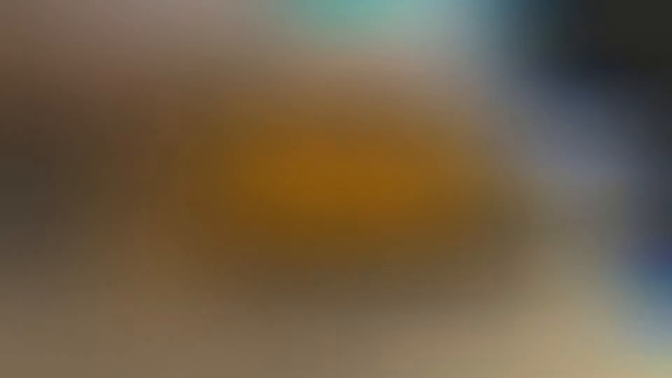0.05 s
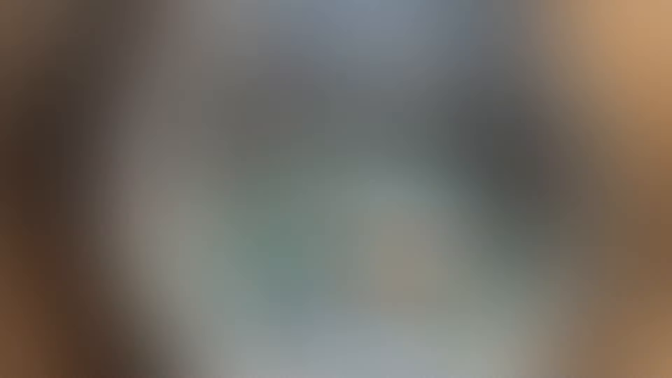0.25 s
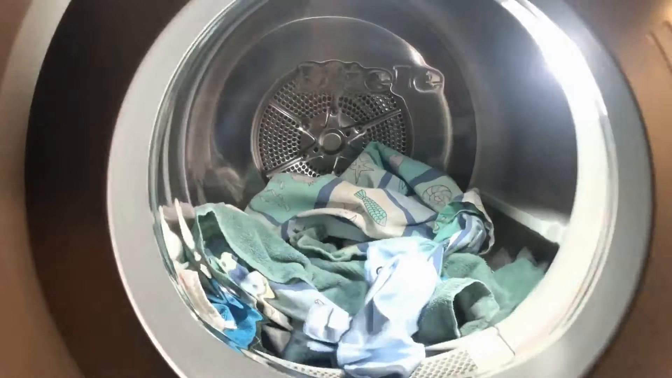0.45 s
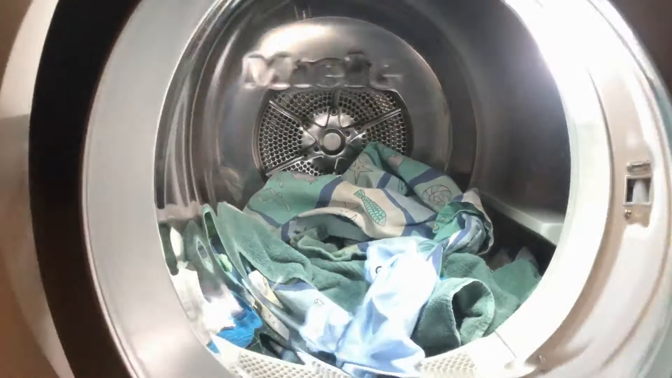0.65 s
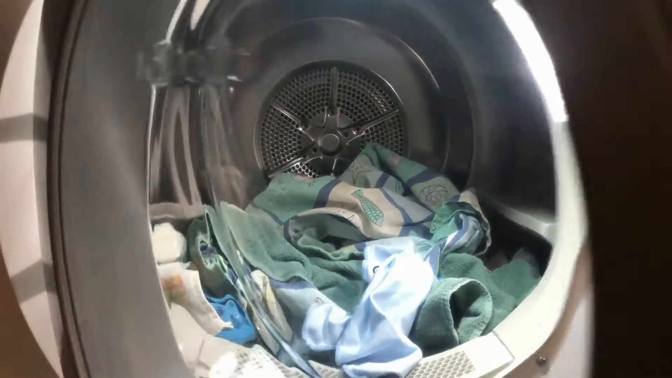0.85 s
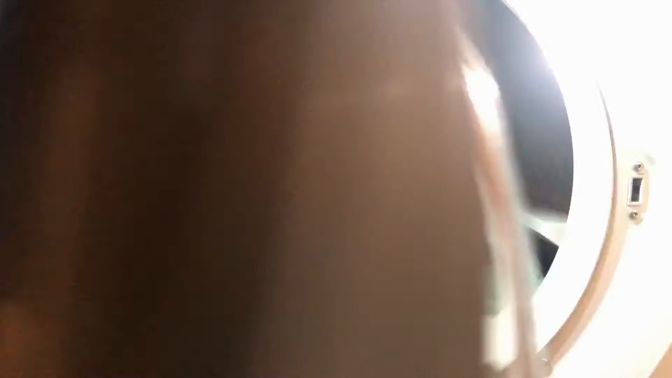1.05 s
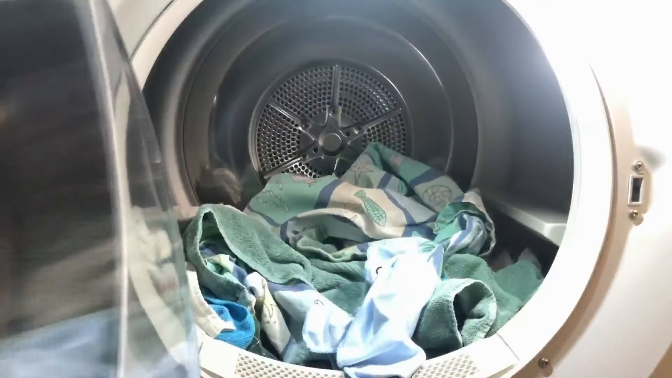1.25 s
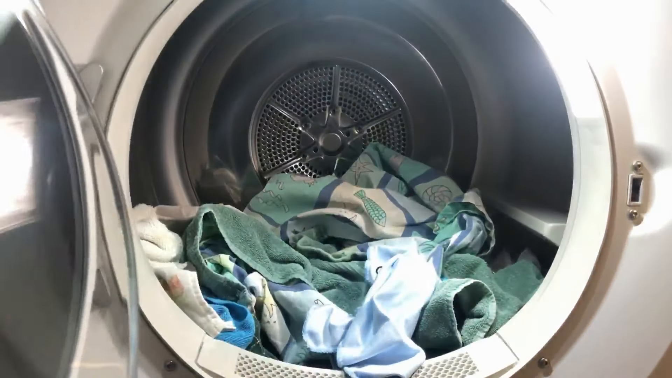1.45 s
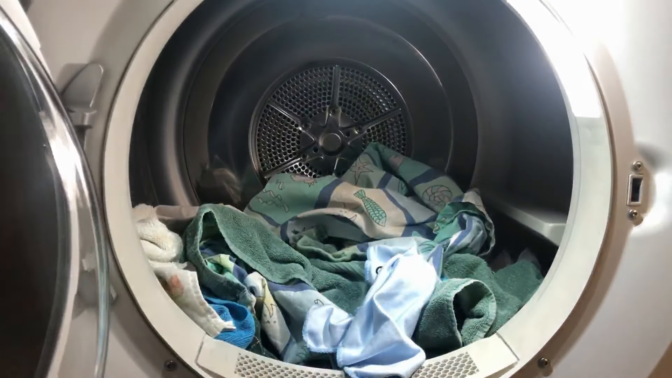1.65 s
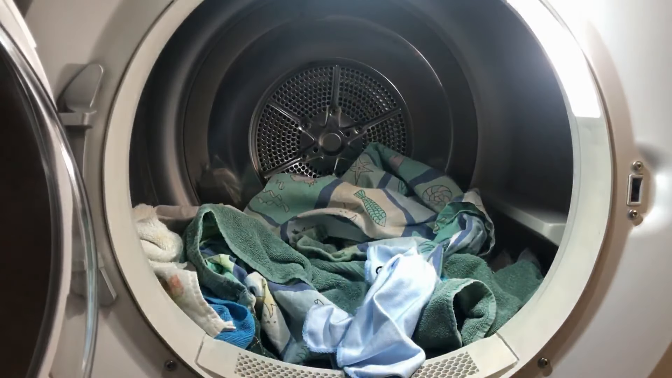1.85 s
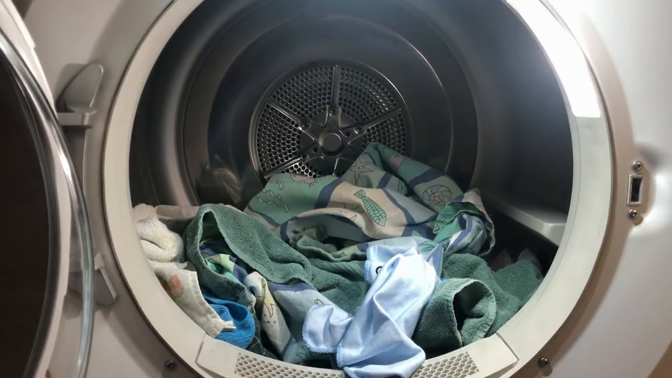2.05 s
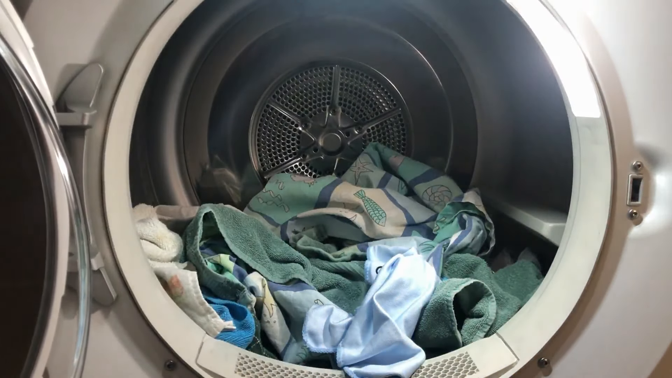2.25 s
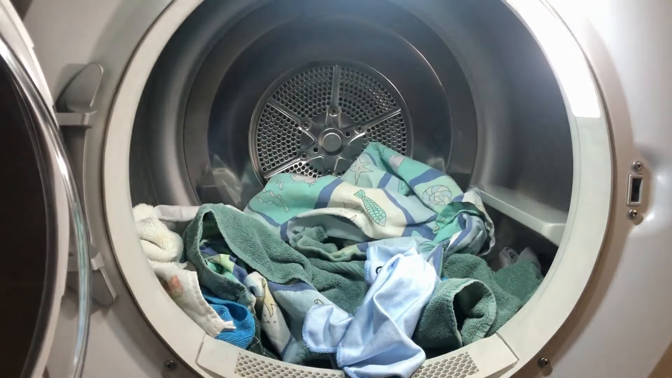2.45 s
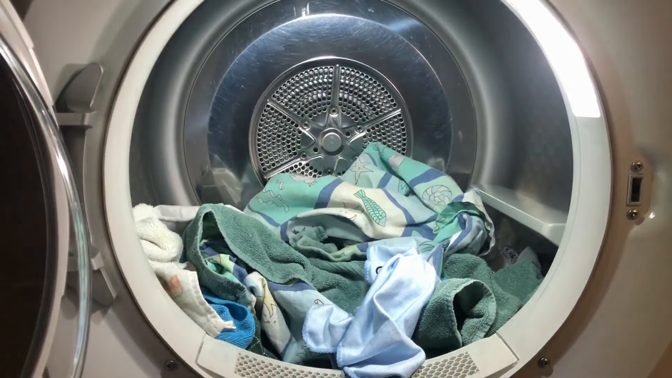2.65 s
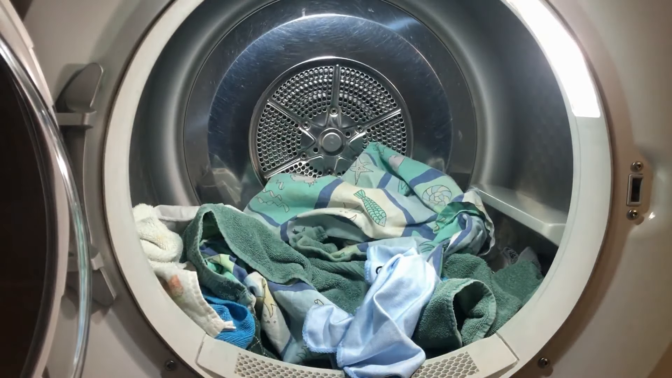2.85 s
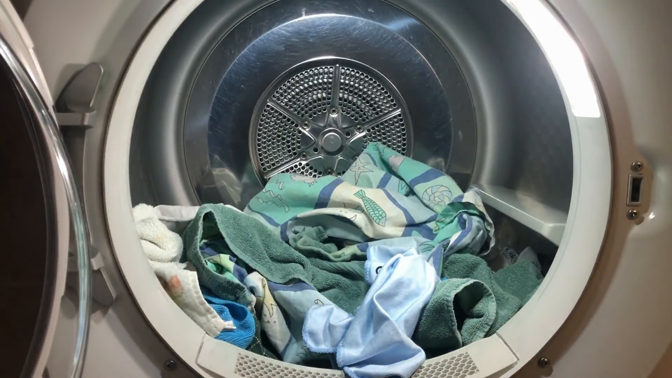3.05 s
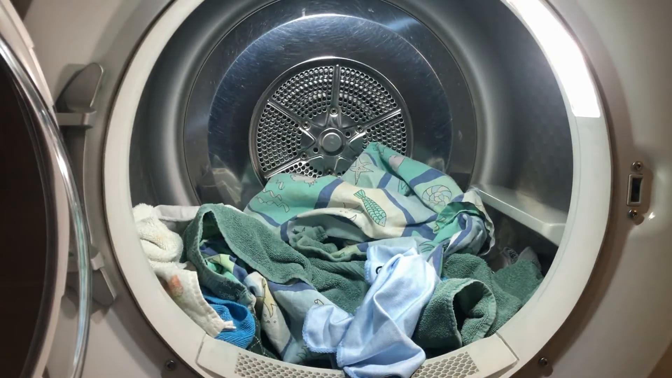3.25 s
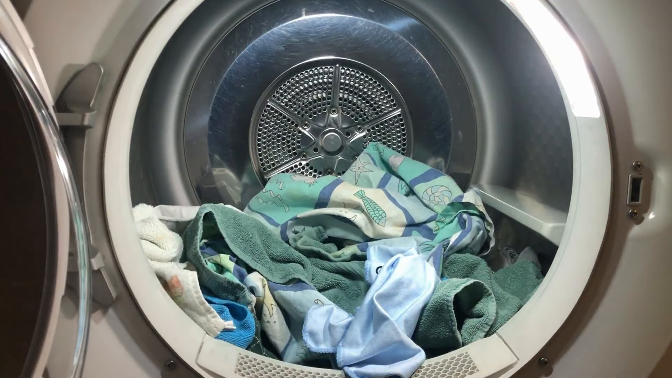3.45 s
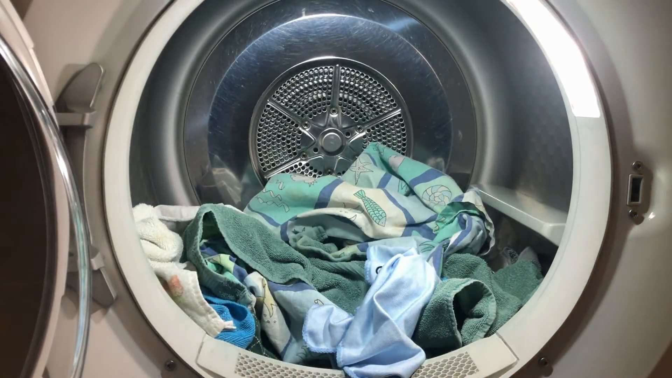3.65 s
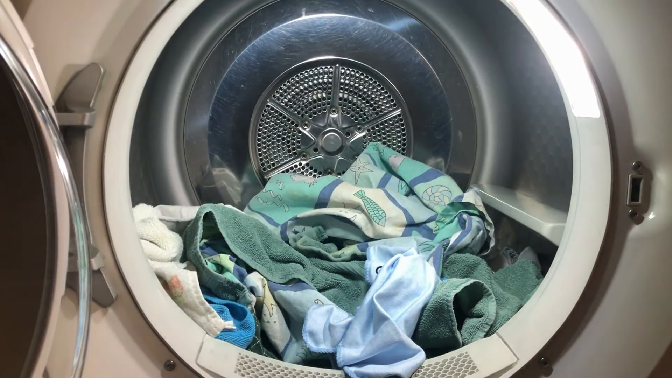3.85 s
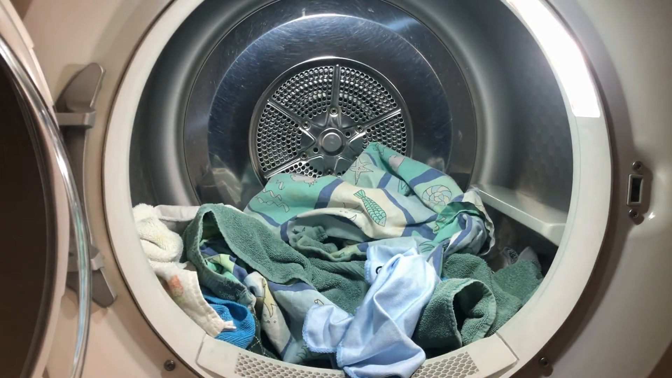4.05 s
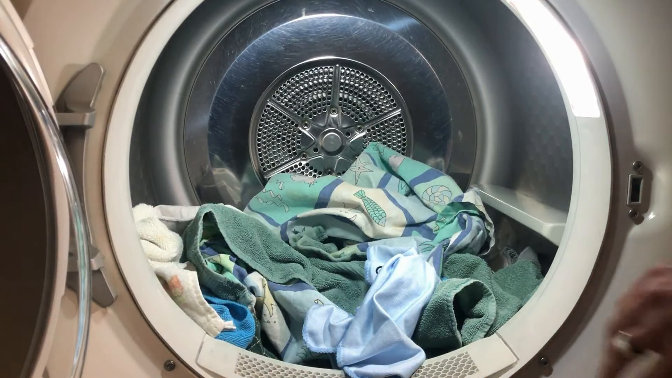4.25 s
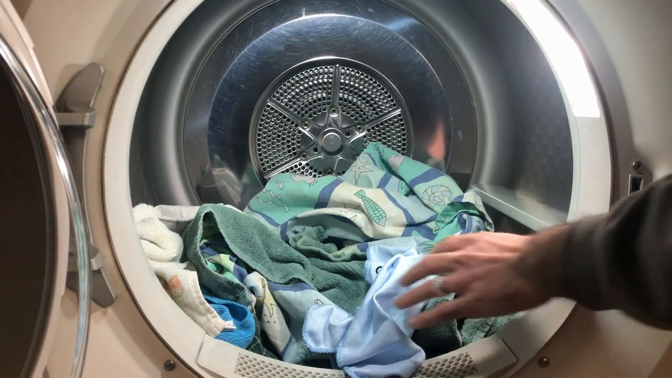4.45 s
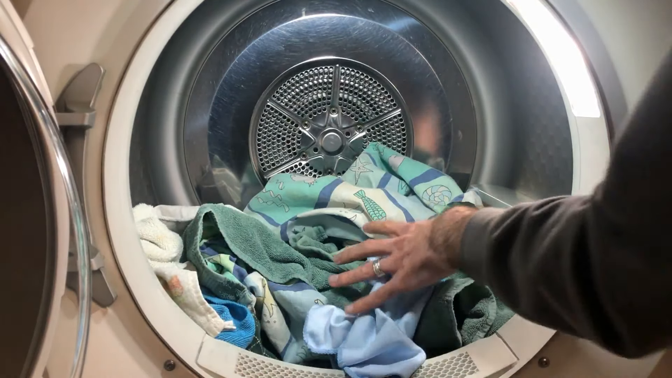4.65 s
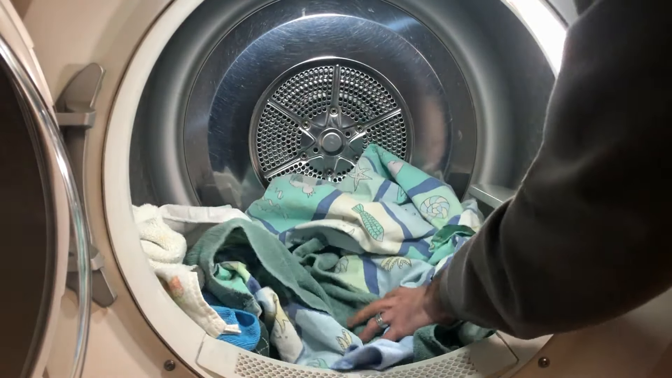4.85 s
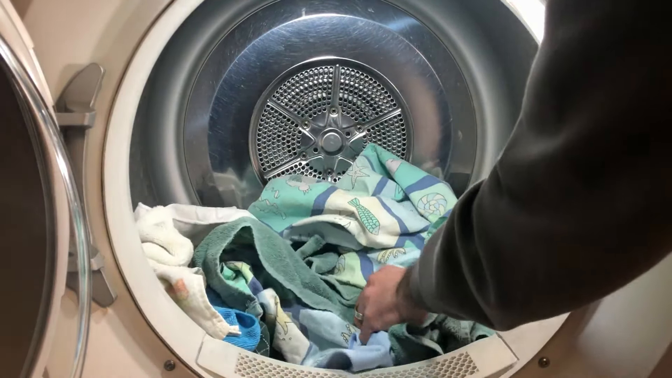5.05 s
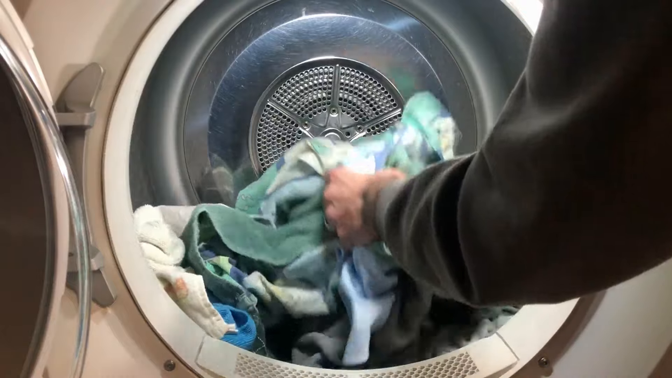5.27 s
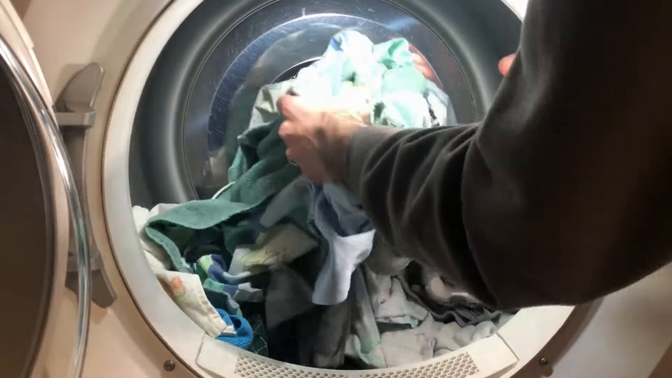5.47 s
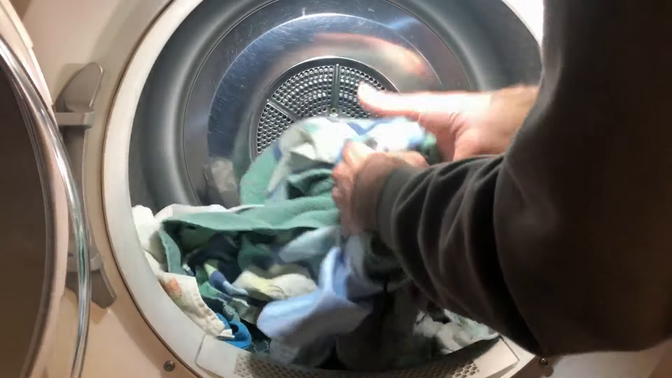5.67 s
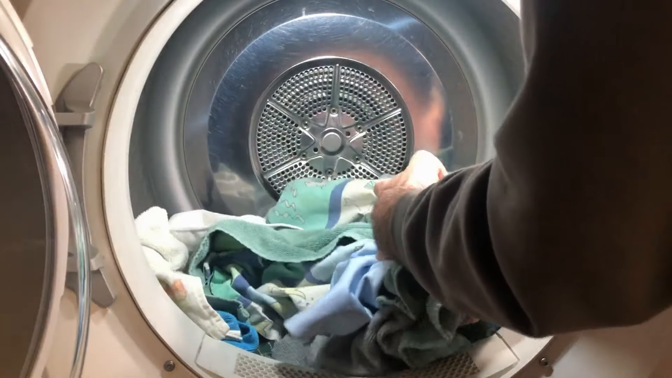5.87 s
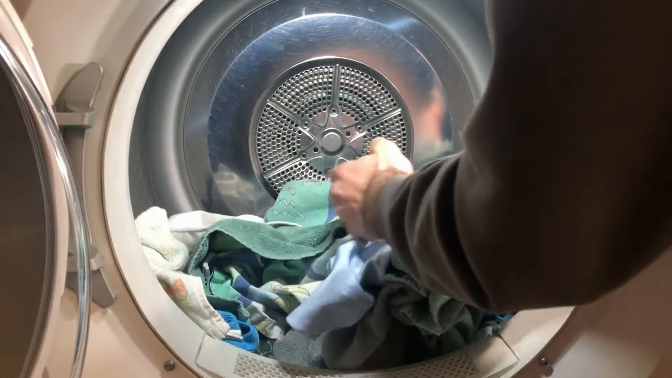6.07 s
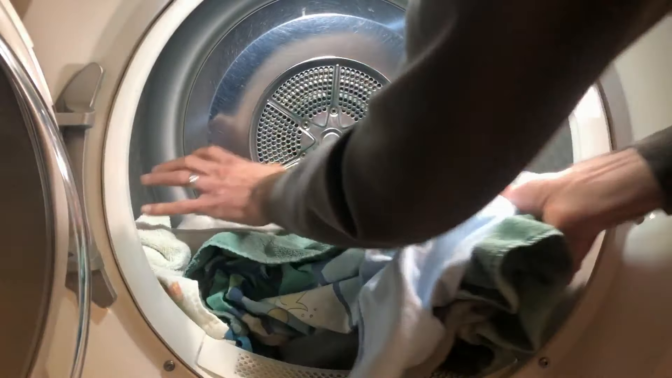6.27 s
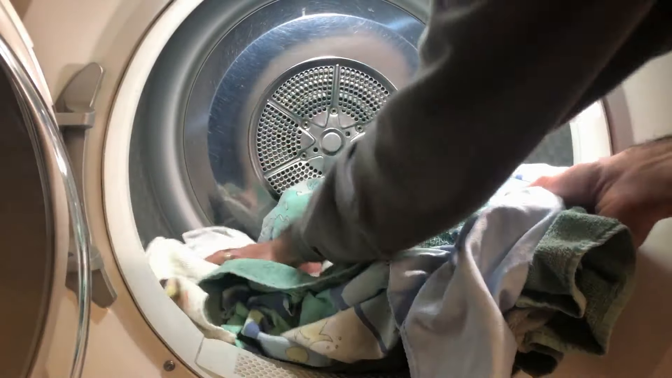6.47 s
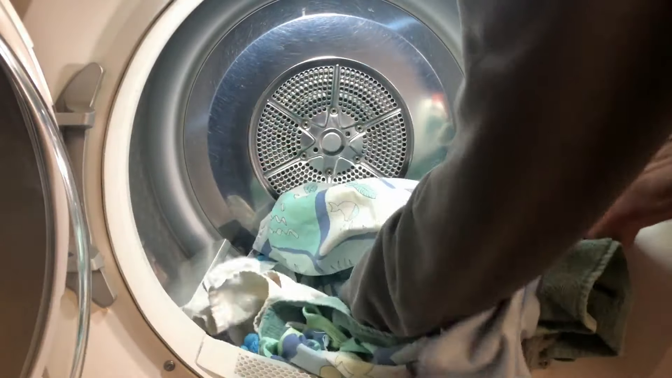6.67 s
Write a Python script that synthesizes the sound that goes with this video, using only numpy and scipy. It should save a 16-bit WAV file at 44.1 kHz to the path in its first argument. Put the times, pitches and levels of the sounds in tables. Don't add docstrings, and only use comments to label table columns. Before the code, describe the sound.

A microphone near a tumble dryer catches quiet hiss and a faint high whine, then a hard metallic snap of the latch with a short ring. The swinging door buffets the air and bumps its stop with a dull boom and small rebounds. Shoes scuff, a basket is set down with a knock, then hands rustle through laundry, ending in several muffled drum thumps.

```python
import sys
import numpy as np
from scipy import signal
from scipy.io import wavfile

SR = 44100
rng = np.random.default_rng(int(sys.argv[2]) if len(sys.argv) > 2 else 0)


def natural_amplitude(level_db):
    exponent = np.asarray(level_db, float) / 20
    return 10 ** exponent


def transcribe(u):
    v = np.clip(np.atleast_2d(u).T, -1, 1)
    q = np.round(v * 32767).astype(np.int16)
    wavfile.write(sys.argv[1], SR, q)


N = 295911

BAND_EDGES = 31 * 2 ** np.arange(0, 9.4, 1 / 3)
BAND_HZ = np.minimum(np.sqrt(BAND_EDGES[1:] * BAND_EDGES[:-1]), 15000)
ROOM_T60 = [(50, 0.57), (150, 0.92), (500, 0.37), (1200, 0.31), (3000, 0.26), (8000, 0.15), (16000, 0.1)]

# pitch_hz, density_db (per Hz)
HISS_COLOUR = [(30, -19), (45, 4.5), (64, 0), (129, -4.5), (295, -3.5), (1220, -18.5), (2070, -18.5),
               (3240, -23.5), (4370, -21), (5200, -20.5), (6350, -26.5), (7400, -24.5), (12000, -28.5),
               (15600, -27)]
HISS_DB = -68
# peak_s, level_db, rise_s, fall_s
WHINE = [
    (.5, -87, 3., 7.1),
    (2.2, -82, 3, 2.105),
    (5., -85.5, 6., 6.),
]
WHINE_HZ, WHINE_WIDTH_HZ = 5660, 60
SWELL_DB = 20

# pitch_hz, density_db (per Hz)
THUDS = [(.01, -64, 0.14, .3), (.3, -68.5, .15, .06), (.415, -40, .06, 0.21), (.85, -62.5, .3, .5),
         (1.56, -61, 0.13, .16), (1.87, -62.5, 0.27, 0.13), (2.04, -83, .06, 0.12), (3.15, -67, 0.18, 0.33),
         (3.606, -65, 0.057, 0.12), (3.736, -70, 0.11, 0.48), (3.984, -71.5, .07, .4),
         (4.276, -76.5, .05, .12), (4.385, -42, 0.019, 0.19), (4.46, -46, .1, 0.69), (5.2, -69, 0.45, .05),
         (5.34, -60, .11, 0.23), (5.71, -60, 0.13, 0.29), (6.146, -63, 0.4, 0.069), (6.226, -65, .05, .6),
         (6.44, -50, 0.05, .5), (6.6, -47, 0.22, .8)]
THUD_COLOUR = [(30, -25.5), (50, -12), (70, 6), (110, -0.5), (160, -11), (260, -45)]

# peak_s, level_db, length_s, direction (sign and size)
GUSTS = [
    (1.191, -55, 0.013, 0.84),
    (1.215, -50.5, 0.0096, -0.89),
    (1.236, -53, 0.0085, 0.93),
    (1.285, -49.5, 0.013, 0.85),
    (1.337, -57.5, 0.011, -0.82),
    (1.443, -49.5, 0.011, 1),
]

# peak_s, level_db, rise_s, fall_s
SCUFFS = [
    (1.194, -69.5, 0.25, .2),
    (3.29, -56.5, 0.038, 0.11),
    (3.34, -54, 0.088, 0.057),
    (3.706, -63.5, 0.29, 0.06),
    (3.828, -52.5, 0.12, 0.059),
    (4.51, -47.5, 0.015, 0.094),
]
HEAVES = [(.01, -74, 0.14, 0.098), (.25, -66.5, 0.054, 0.72), (.8, -82.5, 0.31, 0.56),
          (1.07, -82, 0.27, 0.12), (1.74, -81.5, 0.023, 0.48), (2.77, -74.5, 0.094, 0.24),
          (4.43, -54, 0.044, 0.13), (4.76, -70.5, 0.058, 0.36), (5.78, -64.5, 0.13, 0.13),
          (5.3, -72.5, 0.75, 0.55), (6.37, -71, 0.085, 0.19), (6.6, -68, 0.11, 0.32)]
# time_s, level_db
HANDLING = [(0, -92), (.9, -81), (1.4, -84.5), (1.6, -78.5), (1.72, -86), (2.03, -83), (2.25, -105.5),
            (2.6, -87), (2.98, -76), (3.22, -73), (3.48, -77), (3.95, -71.5), (4.1, -76), (4.68, -68),
            (5.38, -65.5), (5.55, -68), (6.0, -67), (6.71, -65)]
# pitch_hz, density_db (per Hz)
RUB_COLOUR = [(88, -35), (150, -5), (290, -2), (541, -6), (632, -3.5), (1200, -7.5), (1320, -9), (1950, -9),
              (3050, -9), (6260, -16), (7170, -17), (8060, -19), (15600, -22)]
# weave_db, fold_db, weight_db
SOLE, BUNDLE, SLEEVE = (-2.4, -1.6, -23), (-13.5, 11, 12), (-3.5, 1, 1.85)

# start_s, peak_db, centre_hz, t60_s
CRACKLES = [(.212, -52, 12100, 0.025), (.347, -46.5, 5020, 0.015), (1.608, -47, 13000, 0.13),
            (1.838, -54, 11000, .043), (2.2596, -34.5, 11700, 0.15), (3.768, -58, 11900, .1),
            (4.448, -50, 6550, 0.078), (4.64, -52.5, 3990, 0.061), (4.796, -53, 8930, 0.038),
            (4.833, -57, 9000, .028), (4.875, -62, 7840, 0.045), (5.478, -50.5, 5400, 0.036),
            (5.905, -57.5, 4470, 0.044), (5.939, -59, 4000, .03)]
TAPS = [
    (1.862, -58, 420, .1),
    (2.259, -38.5, 5050, .088),
    (2.26, -43, 2730, .26),
    (3.599, -53, 170, .22),
    (4.012, -52, 560, .04),
    (4.359, -39, 4900, .1),
    (4.454, -47, 5200, .036),
    (5.657, -35, 1200, .04),
    (6.517, -44, 700, .1),
]
BUMPS = [
    (0.335, -43, 1508, 0.21),
    (1.862, -54.5, 1200, 0.16),
    (2.758, -58, 1200, 0.35),
    (3.595, -50.5, 915, 0.52),
]
CREAKS = [
    (.135, -54, 736.3, 0.61),
    (.231, -43.5, 1100, .2),
    (.372, -44, 900, 0.62),
    (.373, -28.5, 2972, 0.48),
    (6.465, -43, 639.5, 0.089),
]
CATCH = [
    (.3696, -19, 2500, .015),
    (.3701, -15, 10000, .012),
]
POPS = [
    (.931, -46, 850, .06),
    (.954, -45, 1000, .06),
]
SLIPS = [
    (.276, -53.5, 9000, 0.14),
    (.334, -50, 10950, .15),
    (4.494, -38, 4100, 0.17),
    (4.495, -40.5, 12000, 0.18),
    (4.506, -56, 4500, 0.068),
    (4.36, -49, 12000, .12),
]
# width_octaves, snap_db
CRACKLE_KIND, TAP_KIND, BUMP_KIND, CREAK_KIND = (1, 2.8), (0.46, 1.88), (1.3, 0.94), (0.93, -9.5)
CATCH_KIND, SLIP_KIND = (1.1, 7), (1.1, -7.5)

# start_s, peak_db, pitch_hz, t60_s
RINGS = [(.416, -37, 1196, .3), (.42, -50, 813, .69), (.385, -39, 86, 1.1), (.46, -46, 64, 1.0),
         (1.627, -59.5, 367.7, .38), (1.74, -70.5, 1101, .35), (2.252, -41, 88, .2), (2.28, -40, 253, .3),
         (2.463, -47, 375, .14), (2.48, -48, 183, .5), (2.495, -49, 253, .3), (2.81, -52, 255, .25),
         (2.9, -53.5, 257.4, .24), (3.785, -59, 1124, .46), (3.8, -67, 3400, .23), (4.375, -37, 88, .7),
         (4.39, -40, 290, .2), (4.543, -45, 1370, .06), (4.74, -56, 800, .3)]
PINGS = [(.212, -54, 1500, .03), (.277, -58, 6200, .1), (.277, -66, 12300, .15), (.278, -60, 2050, .15),
         (.278, -62, 2950, .12), (.279, -64, 4500, .15), (.348, -54, 3300, .06), (.3693, -9, 1180, .016),
         (.3695, -21, 780, .06), (.372, -22, 2400, .05), (.931, -51, 850, .06), (.954, -50, 1050, .05),
         (4.3595, -27, 1150, .06), (4.375, -29, 1180, .045), (4.359, -34, 750, .08), (4.36, -41, 2600, .08),
         (5.657, -36, 1150, .04), (5.6575, -43, 2000, .03)]
RING_SWELL_S, PING_SWELL_S = 0.0099, 0.00022
RING_SPLIT = 0.054

# peak_s, level_db, rise_s, fall_s
BOOM = [
    (2.275, -42, 0.016, 0.12),
    (2.335, -36, 0.052, 0.064),
    (2.43, -50, 0.089, .15),
    (2.56, -47, 0.22, .17),
    (2.73, -51, 0.047, 0.12),
    (2.85, -54, .07, .1),
    (2.96, -53, .2, 0.1),
    (3.02, -57.5, .1, 0.032),
    (3.1, -65, 0.049, .06),
    (3.17, -65.5, 0.09, 0.12),
]
BOOM_HZ = 67.2

# pitch_hz, density_db (per Hz)
DRUM = [
    (6.359, -49),
    (6.419, -44),
    (6.464, -37),
    (6.516, -30.5),
    (6.534, -28.5),
    (6.555, -34.5),
    (6.6, -48),
    (6.639, -40.5),
]
DRUM_MODES = [(130, -18, 0.23), (186.6, -2, 0.49), (296, -2, 0.12), (582, -6.5, 0.088), (850, -21, 0.12)]
DRUM_COLOUR = [(35, -37), (60, -18), (202, 0), (360, -12), (667, -10), (749, -17), (1240, -22.5),
               (2080, -31), (3570, -36), (6000, -40), (7800, -65), (13200, -120)]
RIM = [
    (5.657, -27),
    (5.765, -38),
    (5.776, -39),
    (5.827, -49),
]
RIM_MODES = [(253, -10.5, 0.63), (374, 1, 0.16), (460, 0.5, 0.19), (776, -16, 0.068), (985, -18, 0.19),
             (1400, -40, 0.25), (1640, -15, 0.23)]
RIM_COLOUR = [(59, -54), (100, -13), (467, 2.5), (795, 3), (1010, -7), (1220, -8), (1690, -32), (2070, -41),
              (2460, -31), (6000, -28), (7800, -66), (13200, -120)]
BASKET = [
    (4.358, -21),
    (4.385, -32),
    (4.541, -42.5),
]
BASKET_MODES = [(84.7, -22, 0.73), (186.2, -7, 0.79), (288, -10, 0.18), (361, -11, 0.52),
                (430, -13.5, 0.72), (614, -13, 0.2), (699, -16.5, 0.36), (795, -7.5, 0.26), (860, -6, 0.25),
                (940, -14, .25), (1136, -10, 0.16), (1230, -11, 0.39), (1390, -27, 0.26), (1922, -24, 0.24)]
BASKET_COLOUR = [(29, -45), (50, -9), (167, 2), (218, -3), (291, 2.5), (520, -2), (997, -7), (1150, 0),
                 (1470, -9), (1660, -12), (2110, -17), (2620, -20), (16000, -45)]
STOP = [
    (2.251, -25),
    (2.466, -37.5),
]
STOP_MODES = [(182, -12.5, 0.52), (251, 0, 0.3), (379, 2.5, 0.14), (430, -9.5, 0.32), (610, -26, 0.21),
              (683, -16, 0.36), (890, -32, 0.48)]
STOP_COLOUR = [(47, -28), (80, -5), (125, -12.5), (259, -7.5), (518, -11.5), (606, -11), (1050, -34),
               (1150, -28), (5000, -57), (6500, -81), (11000, -120)]
# pitch_hz, level_db, t60_s
REBOUNDS = [
    (2.638, -51),
    (2.756, -50),
    (2.9, -57.5),
]
REBOUND_MODES = [(252, -2, .2), (346, -0.5, .12), (400, 1, .1), (598, -14, .1)]
LATCH = [
    (.3692, -7),
]
LATCH_MODES = [(85.1, -11.5, .5), (815, 0, .17), (1200, -2.5, 0.33), (1360, -10, 0.5), (1707, -9.5, 0.099),
               (2000, -10, .18), (2320, -11.5, .2), (2475, -5, 0.27), (2924, -9.5, 0.16),
               (3289, -6.5, 0.13), (3420, -5, 0.11), (3680, -9.5, .23), (4150, -10, .2),
               (4850, -12.5, 0.28)]
LATCH_COLOUR = [(29, -45.5), (50, -22.5), (98, -13), (234, -25), (398, -9), (560, -10.5), (746, -8),
                (1050, -8), (1210, -5), (1620, -10), (2400, -7.5), (3410, -11), (4450, -12.5),
                (6300, -16.5), (16000, -36)]
# pitch_hz, level_db, t60_s
HUM_MODES = [(810, -10.5, .9), (866, -14.5, .7), (977, -10, .6), (1007, -11.5, 0.74), (1110, -5.5, 0.55),
             (1174, -9, 0.41), (1211, -4.5, .5), (1290, -10, .6), (1380, -8, 0.54), (1390, -6, 0.27)]
PARTIAL_SPREAD = .02

STEADY_TOP_HZ, MIC_CUT_HZ = 15850, 40
HOUSING_LAG, HOUSING_ECHO = 21, .28
SETTLE_S, SETTLE_DB = 0.32, -5
TREBLE_GAP_S, TREBLE_GAP_HZ = (.351, .365), 3900


def rms_one(x):
    return x / np.sqrt(np.mean(x ** 2) + 1e-20)


def at_hz(points, hz):
    pitch_hz, value = np.array(points).T
    return np.interp(np.log(hz), np.log(pitch_hz), value)


def drift(rate):
    r = np.exp(-80 * np.pi * rate / SR)
    slow = signal.lfilter([1], [1, -2 * r, r * r], rng.standard_normal(N // 40 + 2002))[2000:]
    return np.interp(np.arange(N) / 40, np.arange(len(slow)), rms_one(slow))


def swells(rows):
    t = np.arange(0, N + 64, 64) / SR
    power = 0
    for s, db, rise, fall in rows:
        distance = np.maximum((s - t) / rise, (t - s) / fall)
        power = power + natural_amplitude(db - SWELL_DB * distance) ** 2
    return np.interp(np.arange(N) / SR, t, np.sqrt(power))


def split(source):
    bands = []
    for k, (low, high) in enumerate(zip(BAND_EDGES, BAND_EDGES[1:])):
        band_pass = signal.butter(2, [low, high], "band", fs=SR, output="sos")
        bands.append(signal.sosfilt(band_pass, source[k % 2]))
    return np.array(bands)


def add(out, s, sound):
    i = round(s * SR)
    out[i:i + len(sound)] += sound[:N - i]


def burst(bands, colour_db, t60, rise_cycles):
    t = np.arange(int(.9 * SR)) / SR
    start = rng.integers(0, N - len(t))
    gain = natural_amplitude(colour_db) / np.sqrt(np.sum(natural_amplitude(colour_db) ** 2 * BAND_HZ * .46 / SR))
    swell = (1 - np.exp(-t * BAND_HZ[:, None] / rise_cycles)) ** 2
    decay = natural_amplitude(-60 * t / t60[:, None])
    return gain @ (bands[:, start:start + len(t)] * swell * decay)


def background(bands):
    r, w = np.exp(-np.pi * WHINE_WIDTH_HZ / SR), 2 * np.pi * WHINE_HZ / SR
    whine = signal.lfilter([1, 0, -1], [1, -2 * r * np.cos(w), r * r], rng.standard_normal(N))
    hiss = rms_one(natural_amplitude(at_hz(HISS_COLOUR, BAND_HZ)) @ bands)
    return natural_amplitude(HISS_DB) * hiss + swells(WHINE) * natural_amplitude(1.5 * drift(3)) * rms_one(whine)


def thuds(bands):
    low_noise = natural_amplitude(at_hz(THUD_COLOUR, BAND_HZ)) @ bands[:, ::-1]
    return natural_amplitude(-6.5) * swells(THUDS) * rms_one(low_noise)


def gusts():
    out = np.zeros(N)
    for s, db, length, direction in GUSTS:
        u = np.linspace(-3, 3, round(3 * length * SR))
        push = u * np.exp(-2 * u ** 2)
        add(out, s - 1.41 * length, -direction * natural_amplitude(db + 13.5) * push)
    return out


def rubbing():
    time_s, level_db = np.transpose(sorted(HANDLING))
    handling = natural_amplitude(np.interp(np.arange(N) / SR, time_s, level_db))
    powers = np.array([swells(SCUFFS), swells(HEAVES), handling]) ** 2
    weave_db, fold_db, weight_db = np.transpose([SOLE, BUNDLE, SLEEVE])
    slips = rng.random(N) < 500 / SR
    grains = rng.standard_normal((2, N)) * (1 + slips * np.minimum(rng.exponential(1.5, N), 4))
    out, together = 0, drift(11)
    for band, hz in zip(split(grains), BAND_HZ):
        weight = at_hz([(300, 1), (1000, 0)], hz)
        fold = at_hz([(300, 0), (1000, 1), (3500, 0)], hz)
        weave = at_hz([(3500, 0), (9500, 1)], hz)
        tilt_db = weight * (weight_db + 2.0) + fold * (fold_db - 0.5) + weave * (weave_db + 4.5)
        flicker_db = 1.1 * together + 1.6 * drift(22)
        level = np.sqrt(natural_amplitude(tilt_db) ** 2 @ powers)
        out = out + band * natural_amplitude(at_hz(RUB_COLOUR, hz) + flicker_db) * level
    return natural_amplitude(17) * out


def ticks(bands):
    noise, snapped, click = np.zeros(N), np.zeros(N), np.zeros((2, 4096))
    click[:, 0] = 1
    snaps = split(click)
    room_t60 = at_hz(ROOM_T60, BAND_HZ)
    kinds = [(CRACKLES, CRACKLE_KIND), (TAPS, TAP_KIND), (BUMPS, BUMP_KIND), (CREAKS, CREAK_KIND),
             (CATCH, CATCH_KIND), (POPS, TAP_KIND), (SLIPS, SLIP_KIND)]
    for rows, (octaves, snap_db) in kinds:
        for s, db, hz, t60 in rows:
            colour_db = -12 * (np.log2(BAND_HZ / hz) / octaves) ** 2
            snap = natural_amplitude(colour_db) @ snaps
            target = snapped if db > -40 else noise
            add(target, s, natural_amplitude(db + snap_db) * snap / np.abs(snap).max())
            rustle = burst(bands, colour_db, t60 + 0 * BAND_HZ, rise_cycles=0.98)
            add(noise, s, natural_amplitude(db - 10.5) * rustle)
            tail = burst(bands, colour_db, room_t60, rise_cycles=7.0)
            add(noise, s, natural_amplitude(db - 22.0) * tail)
    return noise, snapped


def rings(rows, swell_s):
    out, t = np.zeros(N), np.arange(SR // 2) / SR
    for (s, db, hz, t60), chance in zip(rows, rng.random((len(rows), 3, 1))):
        cycles = hz * (1 + RING_SPLIT * np.array([[0], [1], [-1]]) * chance) * t
        tone = [.7, .3, .2] @ np.sin(2 * np.pi * cycles)
        add(out, s, natural_amplitude(db - 60 * t / t60) * (1 - np.exp(-t / swell_s)) * tone)
    return out


def boom():
    return np.sqrt(2) * swells(BOOM) * np.sin(2 * np.pi * BOOM_HZ * np.arange(N) / SR)


def blows(bands, events, modes, colour, crack_db, ring_db, room_db, swell_cycles, liveness):
    out, colour_db = np.zeros(N), at_hz(colour, BAND_HZ)
    t = np.arange(SR) / SR
    crack_t60 = 25 / BAND_HZ + .025
    room_t60 = liveness * at_hz(ROOM_T60, BAND_HZ)
    for s, db in events:
        for hz, mode_db, t60 in modes:
            split_by = PARTIAL_SPREAD * min(hz / 700, 1)
            partials = hz * (1 + split_by * rng.uniform(-1, 1, (4, 1)))
            tone = [.8, .4, .35, .3] @ np.sin(2 * np.pi * (partials * t + rng.random((4, 1))))
            swell = 1 - np.exp(-t * hz / swell_cycles)
            add(out, s, natural_amplitude(db + ring_db + mode_db - 60 * t / t60) * swell * tone)
        add(out, s, natural_amplitude(db + crack_db) * burst(bands, colour_db, crack_t60, rise_cycles=0.77))
        add(out, s, natural_amplitude(db + room_db) * burst(bands, colour_db, room_t60, swell_cycles))
    return out


def struck_bodies(bands):
    hits = blows(bands, DRUM, DRUM_MODES, DRUM_COLOUR, crack_db=-4.5, ring_db=-9.5, room_db=-14.5,
                 swell_cycles=2.1, liveness=0.74)
    hits += blows(bands, RIM, RIM_MODES, RIM_COLOUR, crack_db=-11.5, ring_db=-11.0, room_db=-13.0,
                  swell_cycles=3.2, liveness=0.87)
    hits += blows(bands, BASKET, BASKET_MODES, BASKET_COLOUR, crack_db=-4, ring_db=-9.0, room_db=-6.5,
                  swell_cycles=2.6, liveness=0.85)
    hits += blows(bands, STOP, STOP_MODES, STOP_COLOUR, crack_db=-17.0, ring_db=-3.5, room_db=-11.0,
                  swell_cycles=1.8, liveness=0.97)
    hits += blows(bands, REBOUNDS, REBOUND_MODES, STOP_COLOUR, crack_db=-8, ring_db=0.5, room_db=-6,
                  swell_cycles=2.5, liveness=0.77)
    hits += blows(bands, LATCH, HUM_MODES, LATCH_COLOUR, crack_db=-60.5, ring_db=-30, room_db=-58.5,
                  swell_cycles=17, liveness=.9)
    hits += blows(bands, LATCH, LATCH_MODES, LATCH_COLOUR, crack_db=-13, ring_db=-19, room_db=-13,
                  swell_cycles=1.8, liveness=0.98)
    return hits


def scene():
    bands = split(rng.standard_normal((2, N)))
    rustle, snaps = ticks(bands)
    steady_top = signal.ellip(12, .5, 60, STEADY_TOP_HZ, fs=SR, output="sos")
    broad = signal.sosfilt(steady_top, background(bands) + rubbing() + rustle + struck_bodies(bands))
    snap_top = signal.ellip(8, .5, 60, 17000, fs=SR, output="sos")
    snaps = signal.sosfilt(snap_top, snaps)
    ringing = rings(RINGS, RING_SWELL_S) + rings(PINGS, PING_SWELL_S)
    return (broad + snaps + thuds(bands) + gusts() + ringing + boom())[None]


def band_limit(x):
    return signal.sosfilt(signal.butter(12, 17170, fs=SR, output="sos"), x)


def record(dry):
    t = np.arange(N) / SR
    echo = signal.sosfilt(signal.butter(1, 500, "high", fs=SR, output="sos"), dry)
    late_echo = np.pad(echo, [(0, 0), (HOUSING_LAG, 0)])[:, :N]
    settling = natural_amplitude(np.interp(t, [0, SETTLE_S], [SETTLE_DB, 0]))
    heard = settling * (dry - HOUSING_ECHO * late_echo)
    start, end = TREBLE_GAP_S
    gap = np.interp(t, [start - .002, start, end, end + .001], [0, 1, 1, 0])
    dull = signal.sosfiltfilt(signal.butter(6, TREBLE_GAP_HZ, fs=SR, output="sos"), heard)
    heard = heard + gap * (dull - heard)
    bass_cut = signal.butter(4, MIC_CUT_HZ, "high", fs=SR, output="sos")
    return band_limit(signal.sosfilt(bass_cut, heard))


dry = scene()
out = record(dry)
transcribe(out)
```